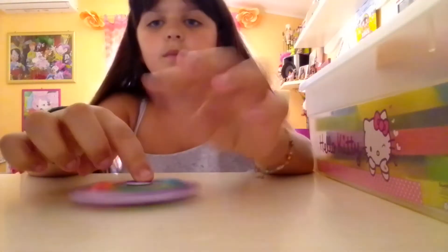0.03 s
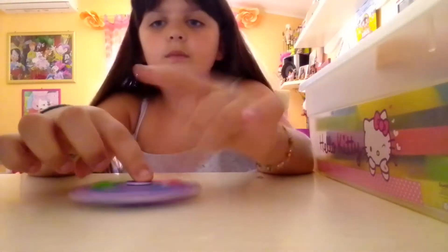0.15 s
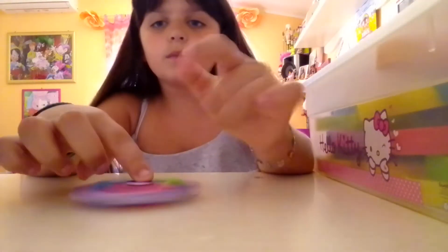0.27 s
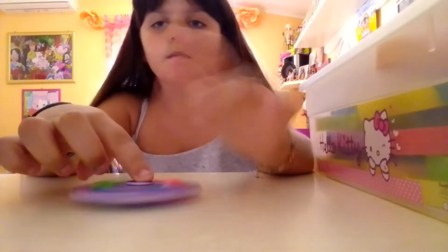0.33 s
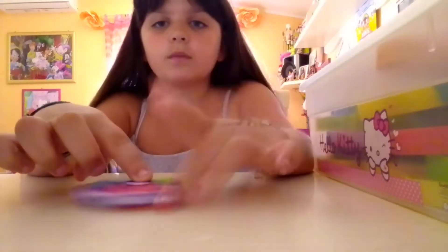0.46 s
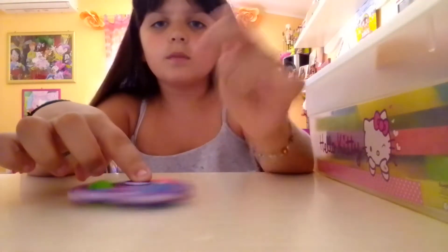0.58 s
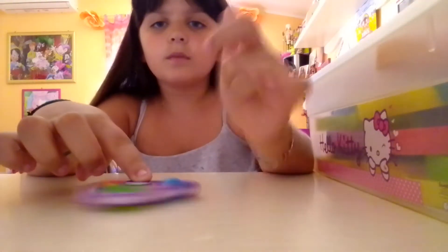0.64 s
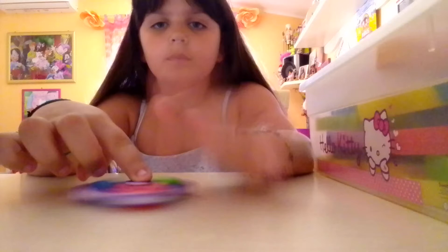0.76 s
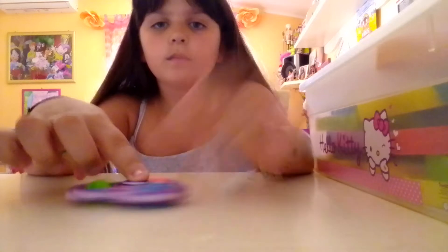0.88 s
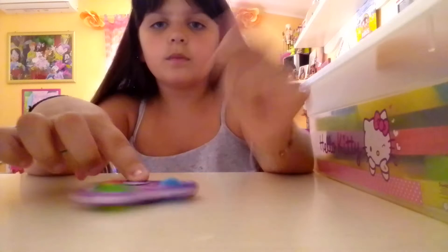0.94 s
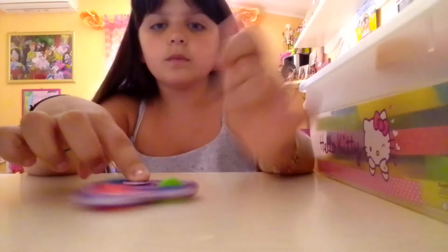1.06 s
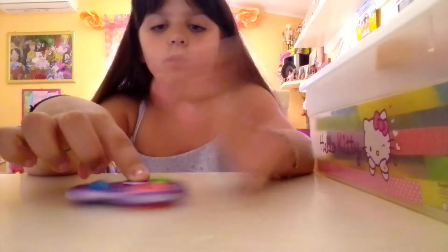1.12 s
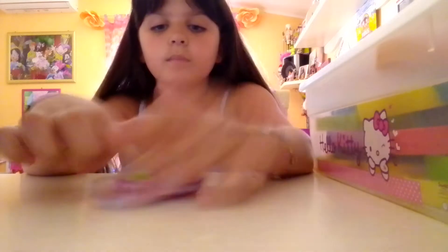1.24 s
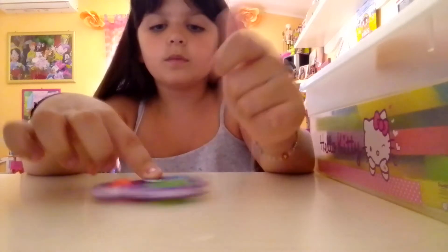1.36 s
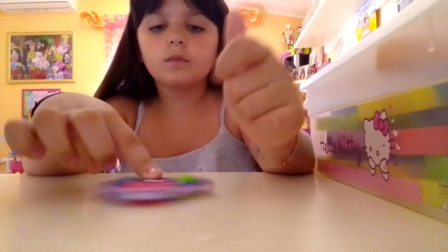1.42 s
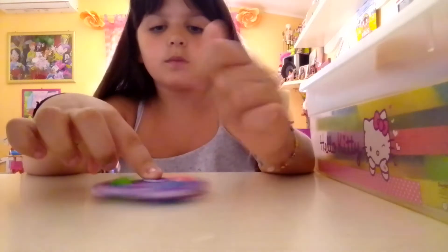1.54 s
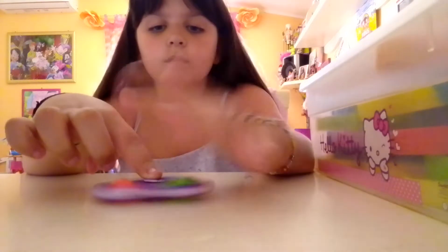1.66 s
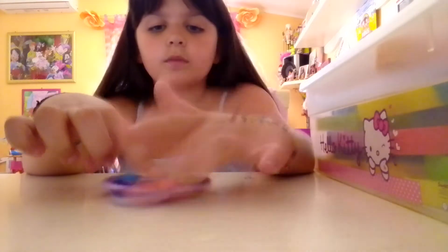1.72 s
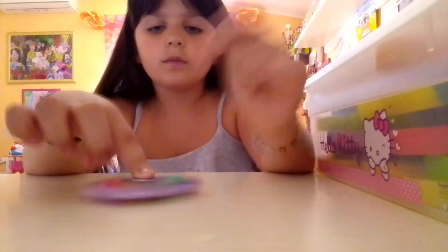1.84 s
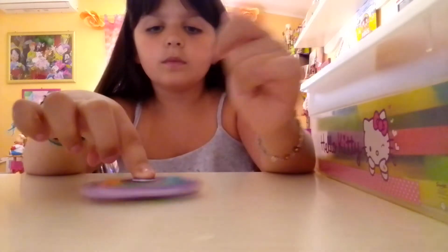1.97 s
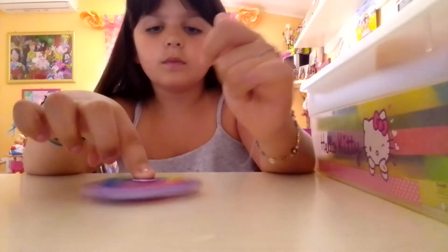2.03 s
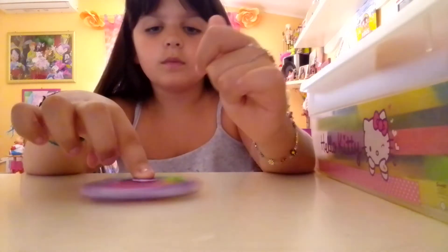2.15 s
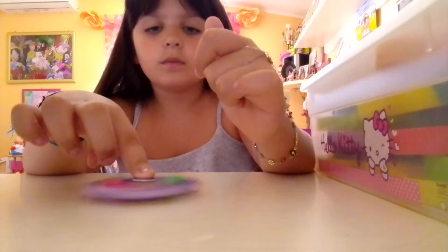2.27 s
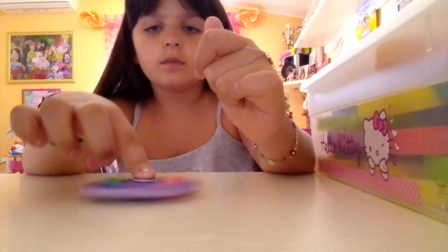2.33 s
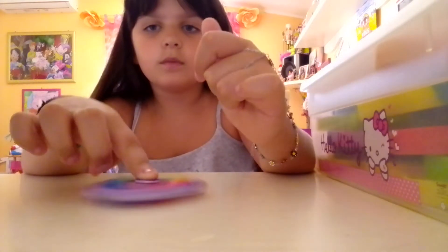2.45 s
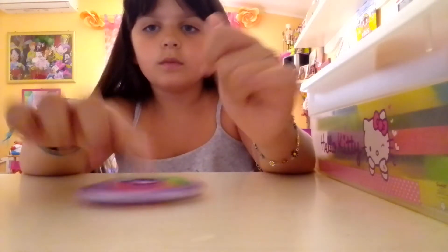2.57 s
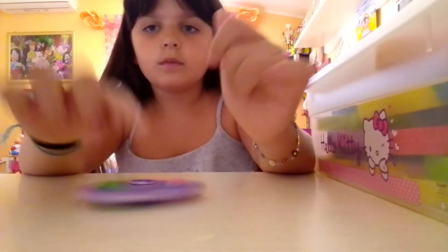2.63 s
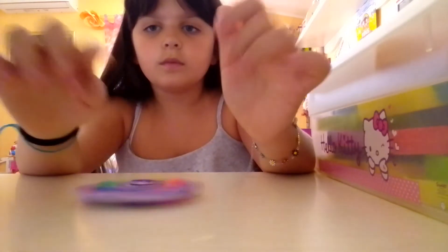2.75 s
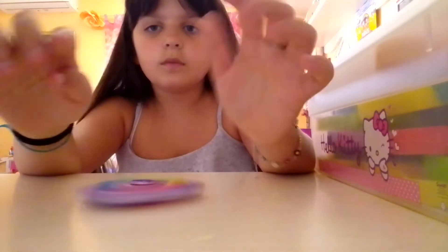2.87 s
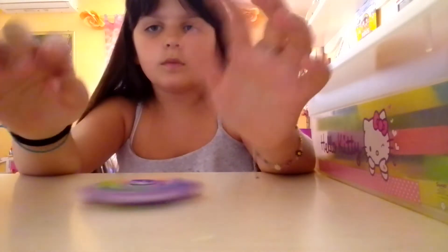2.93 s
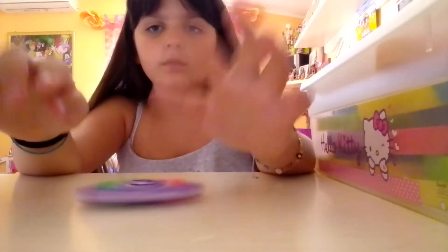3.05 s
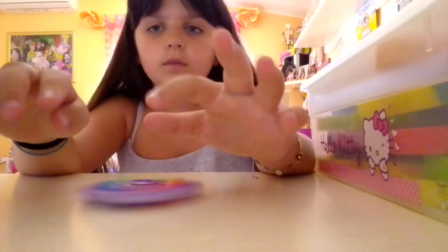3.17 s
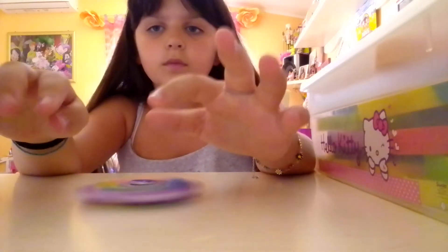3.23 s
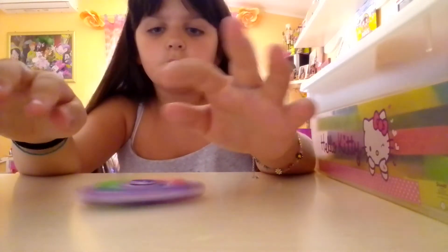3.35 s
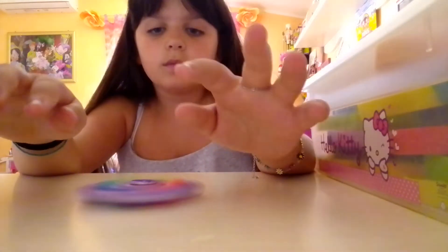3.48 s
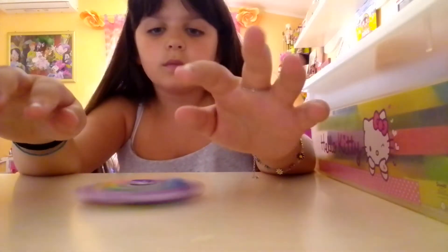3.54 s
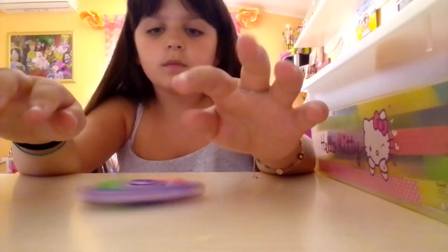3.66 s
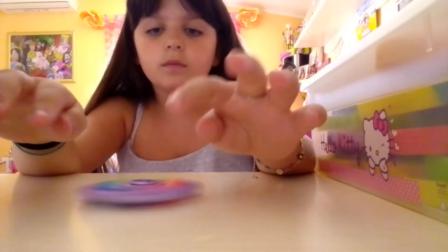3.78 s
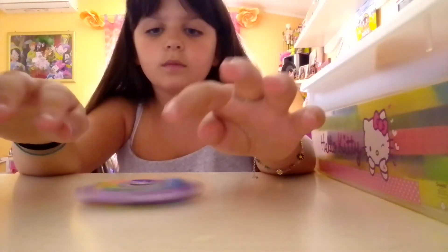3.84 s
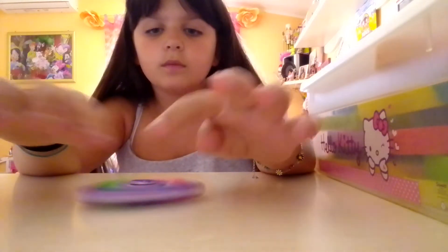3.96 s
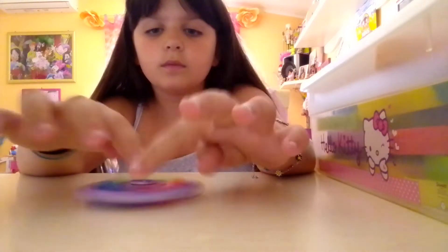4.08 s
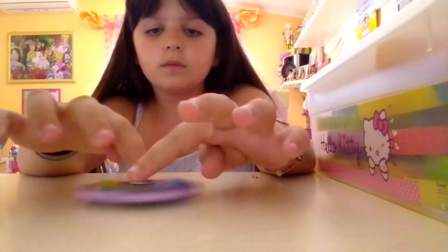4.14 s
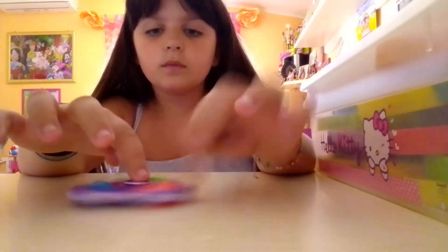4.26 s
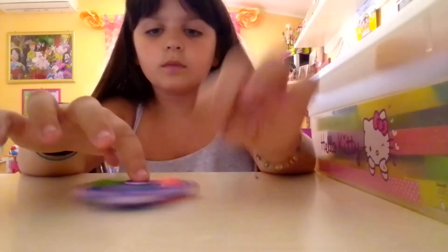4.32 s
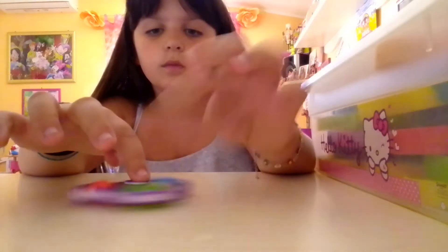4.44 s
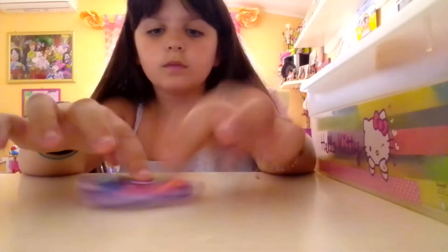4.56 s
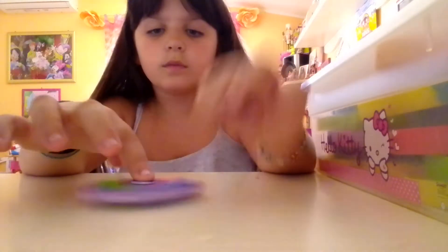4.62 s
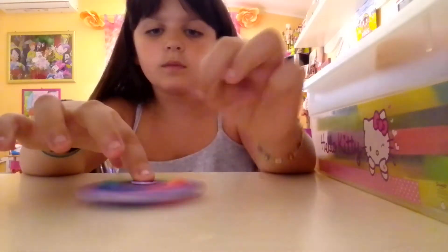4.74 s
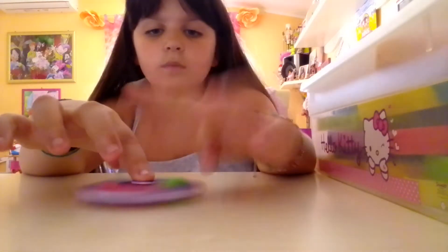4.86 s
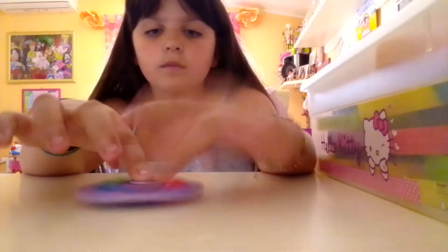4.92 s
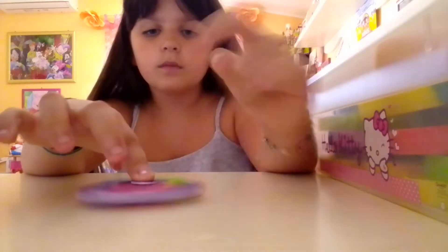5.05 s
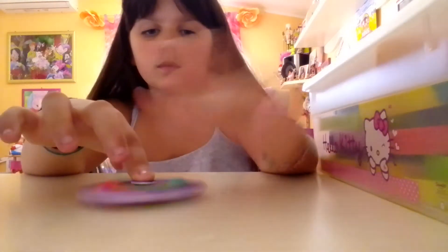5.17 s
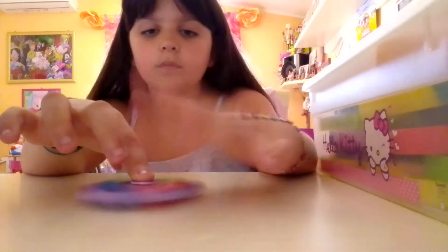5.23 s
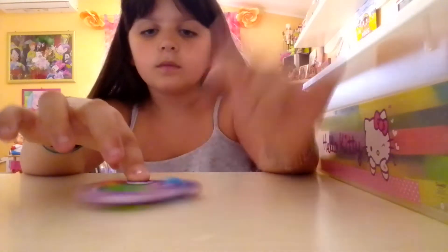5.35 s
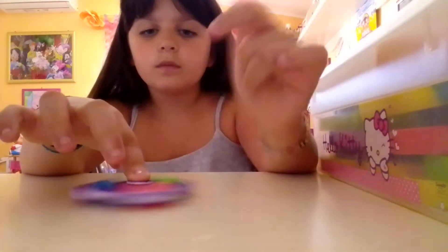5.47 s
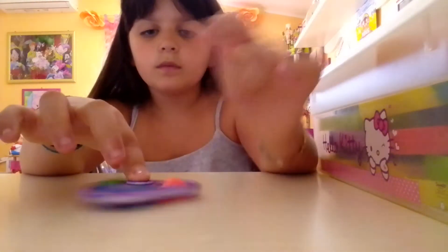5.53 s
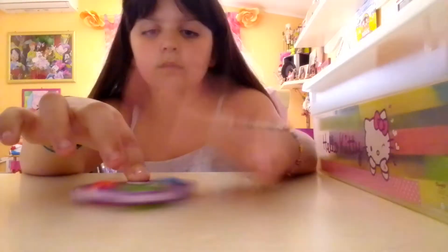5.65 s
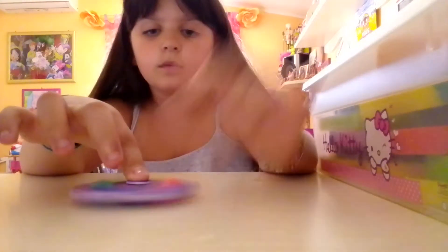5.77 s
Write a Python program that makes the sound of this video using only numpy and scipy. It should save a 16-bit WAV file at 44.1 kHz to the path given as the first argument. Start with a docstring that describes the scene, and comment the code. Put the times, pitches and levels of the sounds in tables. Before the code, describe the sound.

Light taps and bumps build into quick bursts of plastic clatter as fingers flick a spinning toy and it rocks against a desk. Underneath, its bearing keeps up a low, soft whirr. After a few duller knocks it runs untouched for over a second, hissing faintly, before more sharp clacks, thumps and short finger brushes follow. Everything is heard close up in a small, still room.

```python
"""On a desk in a small quiet room, a plastic fidget spinner with silicone pop bubbles whirls close by.
One finger pins the hub while the other hand swipes at the rim: skin swishes, the lobes bump the finger,
and the toy clacks and rocks on the desk top, which thumps. Between swipes the bearing whirrs through
the desk, and hisses and ticks a little while the toy spins free."""
import sys
import numpy as np
from scipy import signal
from scipy.fft import rfft, irfft
from scipy.io import wavfile

SR = 44100
rng = np.random.default_rng(int(sys.argv[2]) if len(sys.argv) > 2 else 0)


def bounce(signal):
    """Save signal as a 16-bit WAV file at the path given by the first command-line argument."""
    frames = np.transpose(np.atleast_2d(signal))
    limited = np.clip(frames, -1, 1)
    pcm = np.round(limited * 32767).astype(np.int16)
    wavfile.write(sys.argv[1], SR, pcm)


N = 255726

# how freely the bearing runs: time_s, free_share (0 pinned, 1 free)
FREE_RUNNING = [(0, 0.24), (0.42, 0.07), (0.55, 0.02), (2.6, 0), (2.95, 0.98), (4.16, 0.46), (4.2, 0)]
# a finger drags along the turning rim: start_s, length_s, first_bump_db, brush_db
RIM_SWIPES = [(0.1411, 0.055, -34.5, -72), (0.415, 0.045, -35.5, -71), (0.8218, 0.08, -36.5, -80),
              (1.264, 0.12, -42.5, -51.5), (1.769, 0.115, -30.5, -49), (4.231, 0.027, -37, -74),
              (4.557, 0.11, -33, -52.5), (4.8919, 0.13, -30, -62), (5.2593, 0.071, -34, -57),
              (5.6518, 0.072, -29.5, -71.5)]


def from_db(db):
    """Decibels to gain."""
    return 10 ** (np.asarray(db) / 20)


def rms_one(x):
    """Scale to unit rms."""
    return x / np.sqrt(np.mean(x ** 2) + 1e-20)


def in_time(rows):
    """Each column of an automation curve, sample by sample."""
    time_s, *columns = np.transpose(rows)
    return [np.interp(np.arange(N) / SR, time_s, c) for c in columns]


def at_hz(points, hz):
    """Each column of a spectrum, read on a log-frequency axis."""
    known_hz, *columns = np.transpose(points)
    return [np.interp(np.log(np.maximum(hz, 1)), np.log(known_hz), c) for c in columns]


def passed(x, edges_hz, kind, order=2):
    """Causal Butterworth filter."""
    sections = signal.butter(order, np.clip(edges_hz, 10, .48 * SR), kind, fs=SR, output="sos")
    return signal.sosfilt(sections, x)


def coloured(noise, spectrum):
    """Shape a noise with an EQ curve; rms 1."""
    level_db, = at_hz(spectrum, np.fft.rfftfreq(N, 1 / SR))
    return rms_one(irfft(rfft(noise) * from_db(level_db), N))


def resonating(force, resonances):
    """A force heard through a few resonances; rms 1."""
    return rms_one(sum(from_db(db) * rms_one(passed(force, [hz - width / 2, hz + width / 2], "band"))
                       for hz, width, db in resonances))


def add(out, sound, start_s):
    """Mix a sound in at its start time."""
    start = max(round(start_s * SR), 0)
    out[start:start + len(sound)] += sound[:N - start]


def room_tone(level_db):
    """A faint steady bed of still room and microphone noise."""
    # the bed's colour: frequency_hz, level_db
    spectrum = [(25, -0.5), (60, 5.5), (130, 11.5), (300, 7.5), (700, 2.5), (1400, -18.5), (3000, -19.5),
                (6000, -25), (10000, -26.5), (16000, -26.5)]
    return from_db(level_db) * coloured(rng.standard_normal(N), spectrum)


def rolling(rate_hz, throb_db):
    """Balls grind in their race, pressed harder once in each slightly uneven cycle."""
    wander = rms_one(passed(rng.standard_normal(N), 6, "low"))
    phase = 2 * np.pi * np.cumsum(rate_hz * (1 + 0.077 * wander)) / SR
    return rng.standard_normal(N) * from_db(throb_db * np.sin(phase))


def bearing():
    """The spinning toy drones and rattles through the desk; its hub rings and hisses."""
    # fader moves of the running bearing: time_s, drone_db, rattle_db, ring_db
    spin_levels = [(0.05, -57, -61.5, -82), (0.36, -54.5, -58.5, -72), (0.55, -51, -59.5, -91),
                   (0.72, -60, -60, -75), (0.92, -49, -55, -74), (1.13, -62.5, -62, -80),
                   (1.6, -49.5, -58.5, -81), (2.0, -52, -49, -57.5), (2.47, -51, -60, -64),
                   (2.52, -61, -64, -75), (2.75, -52, -59.5, -63.5), (3.62, -52, -57.5, -71),
                   (3.86, -54.5, -84.5, -78), (4.42, -57, -57.5, -83), (4.75, -52.5, -54, -63.5),
                   (5.15, -49, -48, -59), (5.59, -58.5, -56, -76.5), (5.78, -49, -48, -63)]
    # desk and hub resonances that the bearing excites: centre_hz, width_hz, level_db
    drone_bands = [(372.8, 67, 2.5), (213.2, 90, -10)]
    rattle_bands = [(604, 85, -5.5), (678, 121, -1), (924, 240, -6.5)]
    ring_bands = [(1867, 149, 0)]
    # hiss with the hub loaded, and running free: centre_hz, width_hz, level_db
    loaded_bands = [(3890, 430, 0.5), (4800, 640, -2), (2850, 220, -7.5), (7000, 590, -10.5),
                    (8700, 830, -10)]
    free_bands = [(4274, 710, 0), (2900, 1240, -8.5), (6700, 1000, -13), (8450, 1100, -15.5),
                  (11550, 530, -20)]
    drone_db, rattle_db, ring_db = in_time(spin_levels)
    free, = in_time(FREE_RUNNING)
    # the dragging finger loads the bearing
    pressed = finger_pressure([(start_s, length_s, 0) for start_s, length_s, *_ in RIM_SWIPES])
    rattle_db += 5.5 * pressed
    ring_db += 12 * pressed
    grind = rolling(rate_hz=25.43, throb_db=2.0)   # one throb a turn
    desk_grind = passed(grind, 1070, "low", order=12)   # the desk passes almost nothing higher
    drone = from_db(drone_db - 0.4) * resonating(grind, drone_bands)
    rattle = from_db(rattle_db - 4.5) * resonating(desk_grind, rattle_bands)
    flutter = rolling(rate_hz=70.8, throb_db=2.5)   # the balls pass several times a turn
    ring = from_db(ring_db - 2.7) * resonating(flutter, ring_bands)
    free_hiss = from_db(-74.5) * resonating(flutter, free_bands)
    loaded_hiss = from_db(-46 + 0.54 * ring_db) * resonating(flutter, loaded_bands)
    return drone + rattle + ring + np.sqrt(free) * free_hiss + np.sqrt(1 - free) * loaded_hiss


def ball_ticks(per_s, level_db):
    """While the bearing runs free, its loose balls now and then tick against each other."""
    # clicks of the balls in their cage: centre_hz, width_hz, level_db
    tick_bands = [(9250, 1300, -3), (11400, 720, -4)]
    t = np.arange(SR // 40) / SR
    free, = in_time(FREE_RUNNING)
    touches = (rng.random(N) < per_s / SR) * rng.uniform(0.53, 1, N)
    chatter = signal.fftconvolve(touches, np.exp(-t / 0.011))[:N] * rng.standard_normal(N)
    return from_db(level_db) * free * resonating(chatter, tick_bands)


def finger_pressure(strokes):
    """The finger's pressure swells and fades in each stroke: start_s, length_s, level_db."""
    pressure = np.zeros(N)
    for start_s, length_s, level_db in strokes:
        swell = np.sqrt(np.hanning(int(length_s * SR)))
        add(pressure, from_db(level_db) * swell, start_s)
    return pressure


def skin_brushes():
    """Skin sticks and slips on the rim in a grainy swish; light strokes are the brightest."""
    # a fingernail grazes the rim: start_s, length_s, level_db
    grazes = [(0.62, .05, -75), (1.594, 0.024, -72), (2.254, 0.011, -71.5), (5.089, .015, -70.5),
              (5.134, 0.018, -76)]
    # the colour of rubbing skin: frequency_hz, level_db
    swish_spectrum = [(2000, 2.5), (2700, -8), (4000, -5), (5500, -6.5), (7300, 0), (9000, -6.5),
                      (10500, -23), (16000, -32.5)]
    strokes = [(start_s, length_s, brush_db) for start_s, length_s, _, brush_db in RIM_SWIPES]
    pressure = finger_pressure(strokes + grazes)
    slips = from_db(3.5 * rms_one(passed(rng.standard_normal(N), 220, "low")))
    friction = rng.standard_normal(N) * slips
    fine_hiss = from_db(-65.5) * pressure ** 0.21 * rms_one(passed(friction, 7000, "high"))
    return pressure * coloured(friction, swish_spectrum) + fine_hiss


def lobe_bumps(count, fade_db):
    """The rim's lobes bump the finger in turn. Rows: start_s, clack_db, thump_db, knock_db, hub_db."""
    rows = []
    for start_s, length_s, bump_db, brush_db in RIM_SWIPES:
        gaps = rng.uniform(.8, 1.2, count) / count
        for progress in np.cumsum(gaps) - gaps[0]:
            thump_db = bump_db - fade_db * progress
            bump_s = start_s + progress * length_s
            rows.append((bump_s, brush_db + 15.5, thump_db, bump_db - 13, brush_db + 6.5))
    return np.array(rows)


def struck(modes, level_db, spread_db, detune, tilt_db=0):
    """One ring per hit; where the finger lands shifts the modes' balance and pitch."""
    t, rings = np.arange(SR // 6) / SR, 0
    chance = rng.standard_normal((len(level_db), len(modes), 3))
    for k, (hz, mode_db, t60) in enumerate(modes):
        level_draw, pitch_draw, polarity_draw = chance[:, k].T
        octaves = np.log2(hz / modes[len(modes) // 2][0])
        gain = from_db(mode_db + tilt_db * octaves + spread_db * level_draw) * np.sign(polarity_draw)
        pitch_hz = hz * (1 + detune * pitch_draw)
        tone = np.sin(2 * np.pi * pitch_hz[:, None] * t)
        rings = rings + gain[:, None] * tone * from_db(-60 * t / t60)
    size = rings.std(axis=1)
    return rings * (from_db(level_db) * size.mean() / size)[:, None]


def desk_thumps(thump_db, knock_db):
    """The desk radiates little below its lowest mode, and the cushioned blow shuts off its highs."""
    # modes of the desk top: pitch_hz, level_db, t60_s
    desk_modes = [(132, -1, 0.033), (160, -3.5, 0.087), (214.7, 4.5, 0.1), (327, 2, 0.067),
                  (377.2, 8, 0.054), (548.4, -2.5, 0.12), (669, 2.5, 0.046), (772, -9.5, 0.053),
                  (907.3, -3.5, 0.045), (994, -5.5, 0.03), (1170, -10, 0.043)]
    low_modes = [mode for mode in desk_modes if mode[0] < 470]
    high_modes = [mode for mode in desk_modes if mode[0] >= 470]
    # a harder blow is shorter and favours the upper modes; a soft finger pad pushes for milliseconds
    hardness_db = 0.25 * (knock_db + 40.5)
    attack_s = .002 * from_db(-3.5 * hardness_db)
    push = 1 - np.exp(-np.arange(SR // 6) / SR / attack_s[:, None])
    thump = struck(low_modes, thump_db - 6.5, spread_db=0, detune=0.082, tilt_db=hardness_db)
    thump = passed(thump, 700, "low", order=4)
    knock = struck(high_modes, knock_db - 7.5, spread_db=6.5, detune=0.043, tilt_db=hardness_db - 0.5)
    knock = passed(passed(knock, 1130, "low", order=10), 370, "high")
    return passed(push * (thump + knock), 110, "high", order=4)


def hub_rings(hub_db):
    """Each hit sets the hub ringing with a short ping."""
    # modes of the hub: pitch_hz, level_db, t60_s
    hub_modes = [(1750, -7.5, 0.056), (1857, 3.5, 0.045), (2010, -13, 0.1), (3874, -22, 0.03),
                 (7700, -18, .09)]
    return passed(struck(hub_modes, hub_db - 4, spread_db=2.5, detune=.02), 1500, "high", order=5)


def shell_clacks(clack_db, treble_db):
    """The plastic shell cracks and rings while the rim scuffs briefly."""
    # modes of the shell: pitch_hz, level_db, t60_s
    shell_modes = [(2682, -4.5, 0.037), (2990, -5.5, 0.04), (3405, -4, 0.033), (3792, 5, 0.016),
                   (4185, 6, 0.018), (4560, -3.5, 0.013), (4937, -4.5, 0.02), (5770, -3.5, 0.021),
                   (6110, -1.5, 0.0065), (6825, 4.5, 0.012), (6900, -14, 0.018), (8000, 2, 0.0047),
                   (8790, 8.5, .018), (10800, -12.5, .014), (12200, -6, .014), (12800, -24, 0.01),
                   (14600, -5.5, .012)]
    t = np.arange(SR // 6) / SR
    softness = from_db(-.17 * (clack_db + 19.5))[:, None]   # light hits land slower and slide longer
    attack = 1 - np.exp(-t / (0.0011 * softness ** 2))
    shell = struck(shell_modes, clack_db - 20.5, spread_db=7, detune=0.025)
    slide = np.exp(-t / (0.003 * softness)) / np.sqrt(softness)
    scuff = from_db(clack_db - 3)[:, None] * rng.standard_normal(shell.shape) * slide
    # hard plastic meets the desk with one sharp push and pull of pressure
    stroke = (t - .0013) / .00006
    crack = from_db(clack_db + 2)[:, None] * stroke * np.exp(-stroke ** 2) / softness ** 2
    clack = passed((shell + scuff) * attack + crack, 2200, "high", order=3)
    top = passed(passed(clack, 7390, "high", order=6), 9000, "low")
    return passed(clack, 6860, "low", order=10) + from_db(treble_db)[:, None] * top


def room_reverb(sound):
    """Diffuse reverb: in each band, noise builds up after the first wall and dies away."""
    # the room's tail: frequency_hz, t60_s, level_db
    tail_bands = [(101, 0.1, -5), (225, 0.44, -3), (500, 1, -14), (970, 0.55, -11), (2500, 0.42, -11),
                  (6000, 0.26, -15), (9800, 0.46, -13.5), (16000, .28, -24.5)]
    t, response = np.arange(SR * 3 // 5) / SR, 0
    edges_hz = np.geomspace(80, 16000, 13)
    for low, high in zip(edges_hz, edges_hz[1:]):
        t60, level_db = at_hz(tail_bands, np.sqrt(low * high))
        envelope = np.clip((t - .004) / 0.002, 0, 1) * from_db(-60 * t / t60)
        envelope /= np.sqrt(np.sum(envelope ** 2))
        band = passed(rng.standard_normal(len(t)), [low, high], "band")
        response = response + from_db(level_db) * envelope * band
    return signal.fftconvolve(sound, response)[:N]


def taps(landing_lead_s, rebound_s):
    """The finger lands, the toy strikes, then it bounces once: a row of levels for each hit."""
    # the toy is tapped or tips onto the desk: start_s, clack_db, thump_db, knock_db, hub_db
    strikes = [(0.449, -63, -38.5, -42, -76), (0.7193, -43.5, -64, -53.5, -55.5),
               (0.7541, -43, -54, -45.5, -49), (0.7866, -61, -34, -45, -56),
               (0.834, -49, -32.5, -39.5, -46), (1.055, -48.5, -73, -81, -62),
               (1.0752, -46.5, -59, -65.5, -55.5), (1.0822, -48, -58, -59.5, -53),
               (1.1793, -45, -29, -42, -51), (1.196, -27.5, -43, -26.5, -38),
               (1.2475, -29, -34.5, -32.5, -43), (1.2531, -25.5, -34, -29.5, -38),
               (1.2766, -18.5, -32, -26, -34), (1.2853, -21.5, -34.5, -37, -35),
               (1.3119, -20, -47.5, -33, -39.5), (1.328, -27, -29.5, -36.5, -39.5),
               (1.3435, -25.5, -34, -35, -42.5), (1.35, -25, -33.5, -31, -37.5),
               (1.4356, -70, -61.5, -39, -57.5), (1.4639, -42.5, -64, -49.5, -51.5),
               (1.6819, -15.5, -30.5, -22, -30), (1.6859, -26, -22, -25, -41),
               (1.7406, -28.5, -40, -35.5, -38.5), (1.7539, -7, -37.5, -18.5, -27),
               (1.7812, -20, -31.5, -35.5, -40), (1.8065, -21.5, -29, -43, -36.5),
               (1.8198, -23.5, -30.5, -31.5, -51.5), (1.8272, -30, -29, -39, -29.5),
               (1.9784, -48.5, -41.5, -44.5, -54), (2.5387, -35, -28.5, -37, -44.5),
               (2.5521, -37.5, -36.5, -41.5, -47), (2.5722, -46, -35, -36, -36.5),
               (2.5832, -32.5, -30.5, -34.5, -46), (2.607, -34, -36, -35, -36.5),
               (2.6979, -48.5, -42, -42, -51), (2.7664, -54, -42.5, -43, -64),
               (2.7983, -62, -46.5, -45.5, -66), (4.1749, -21, -28, -44, -40.5),
               (4.1805, -20, -47, -31.5, -41), (4.2692, -57, -40, -44.5, -50.5),
               (4.4924, -12.5, -27.5, -19.5, -31), (4.4994, -15, -26.5, -18.5, -42),
               (4.5075, -23, -36, -26.5, -38.5), (4.5213, -25.5, -30, -48, -42),
               (4.5472, -12.5, -44, -26, -41), (4.5524, -16.5, -24, -31.5, -39),
               (4.7202, -46, -62.5, -50.5, -52), (4.877, -60, -37, -50, -53.5),
               (5.038, -65, -46.5, -39, -61), (5.226, -17.5, -23.5, -18.5, -23.5),
               (5.2381, -34, -26, -30, -55.5), (5.2581, -37.5, -27.5, -31, -38.5),
               (5.2785, -37.5, -32.5, -36, -31), (5.3159, -39.5, -31.5, -41.5, -57),
               (5.4901, -54.5, -71, -57.5, -65), (5.671, -44.5, -32.5, -43, -44),
               (5.7105, -59, -43, -35.5, -52.5)]
    strikes = np.array(strikes)
    start_s, levels_db = strikes[:, 0], strikes[:, 1:]
    delay_s = rebound_s * np.exp(.2 * rng.standard_normal(len(start_s)))
    firm_clack_db = -28   # lighter hits hardly bounce
    spare_db = levels_db - .5 * np.maximum(firm_clack_db - levels_db[:, :1], 0)
    landing_loss_db, rebound_loss_db = (26, 14, 16, 24), (13, 11, 8.8, 14)   # clack, thump, knock, hub
    landings = np.column_stack([start_s - landing_lead_s, spare_db - landing_loss_db])
    rebounds = np.column_stack([start_s + delay_s, spare_db - rebound_loss_db])
    return np.vstack([strikes, landings, rebounds])


def impacts():
    """Every tap and lobe bump layers a hub ping, a desk thump and a shell clack."""
    hits = np.vstack([taps(landing_lead_s=.0045, rebound_s=.007), lobe_bumps(count=4, fade_db=6.5)])
    start_s, clack_db, thump_db, knock_db, hub_db = hits.T
    dull = (start_s > 1.24) & (start_s < 1.40)   # one run of clacks has hardly any top treble
    treble_db = -11 - 0.25 * clack_db - 39 * dull   # light hits keep a larger share of it
    sounds = hub_rings(hub_db) + desk_thumps(thump_db, knock_db) + shell_clacks(clack_db, treble_db)
    out = np.zeros(N)
    for hit_s, sound in zip(start_s, sounds):
        add(out, sound, hit_s)
    return out


def scene():
    """Hits and swishes with room reverb, over the dry bearing and the room tone; mono."""
    handling = impacts() + skin_brushes()
    reverb = room_reverb(handling)
    whirr = bearing() + ball_ticks(per_s=12, level_db=-89)
    return (handling + reverb + whirr + room_tone(level_db=-67))[None]


def record(dry):
    """A steep low-pass shaves off the very top."""
    cutoff_hz = 16100
    return signal.sosfilt(signal.ellip(10, .1, 80, cutoff_hz, fs=SR, output="sos"), dry)


dry = scene()
out = record(dry)
bounce(out)
```